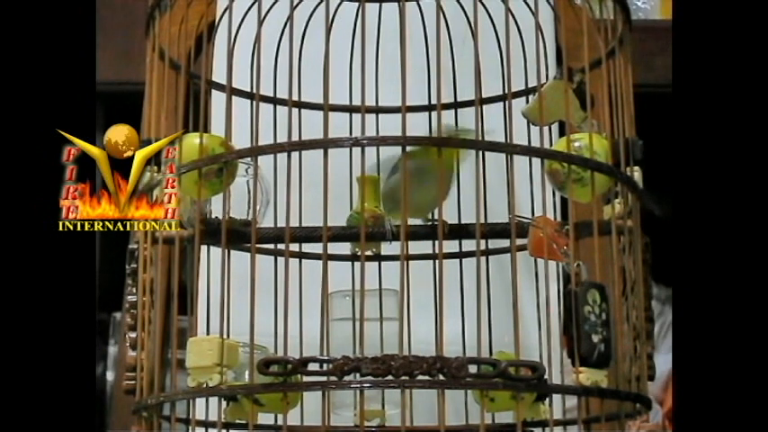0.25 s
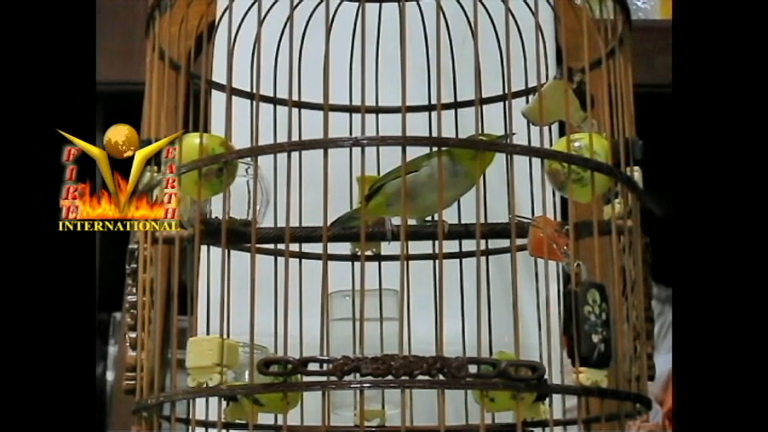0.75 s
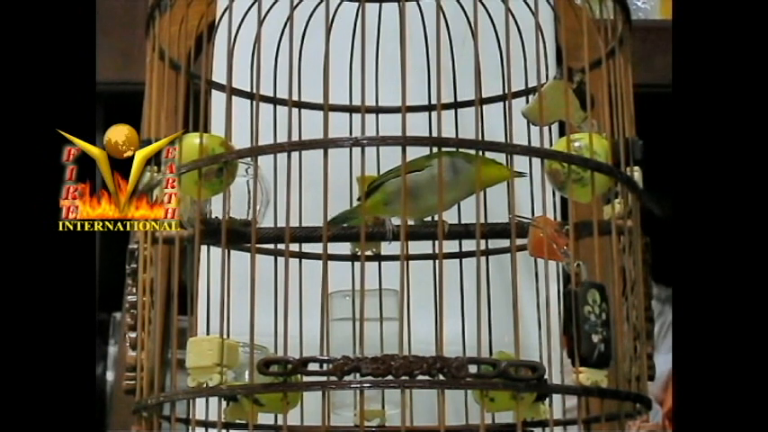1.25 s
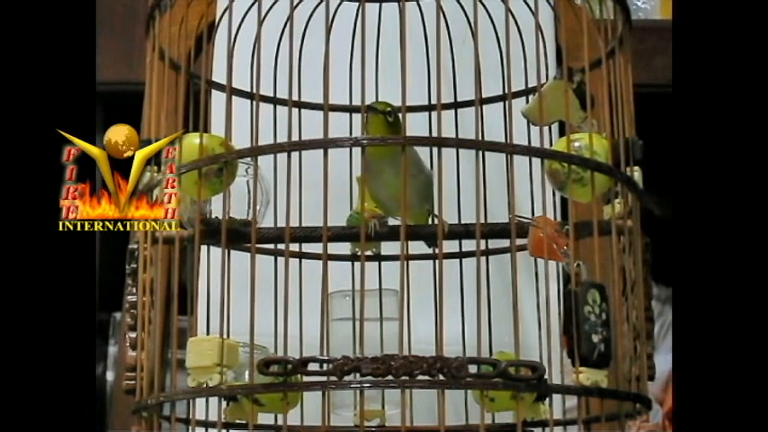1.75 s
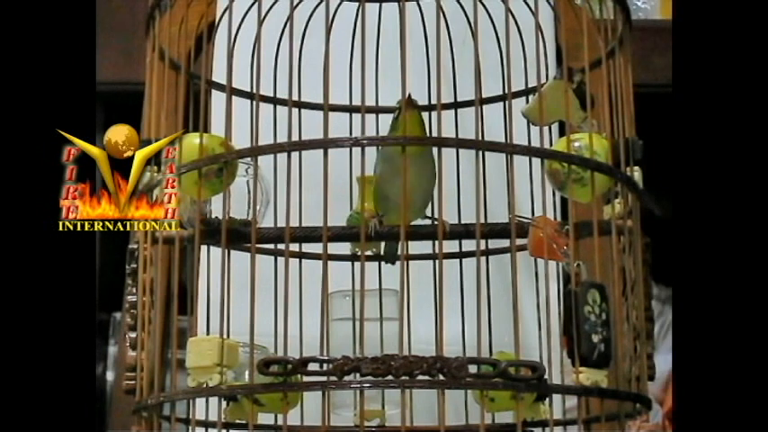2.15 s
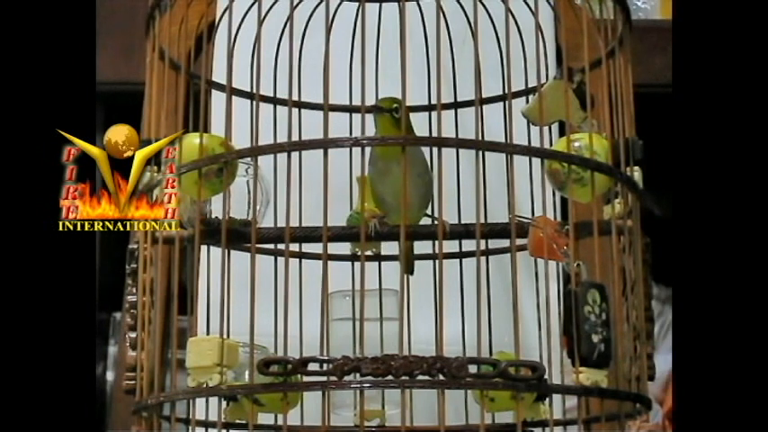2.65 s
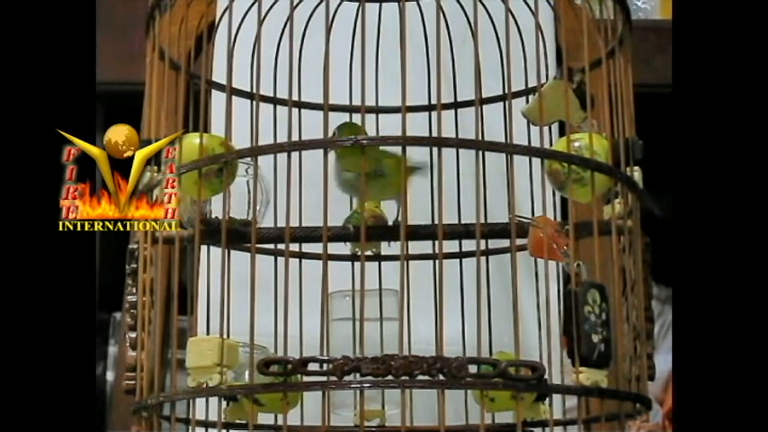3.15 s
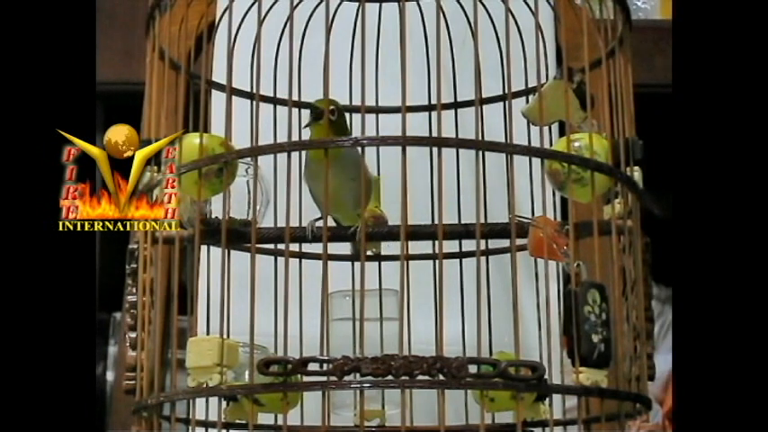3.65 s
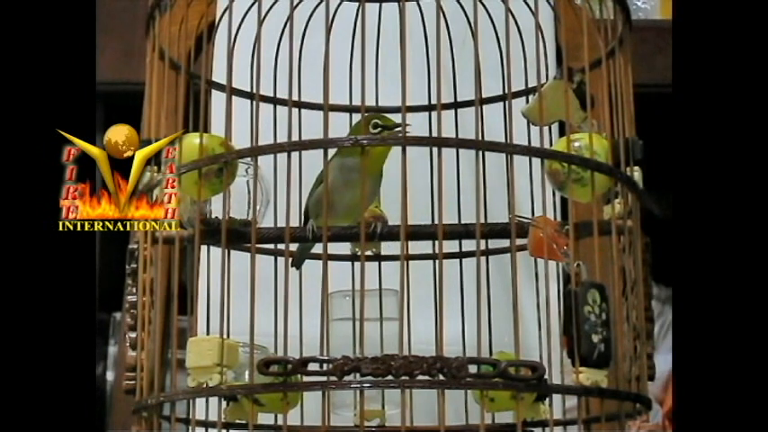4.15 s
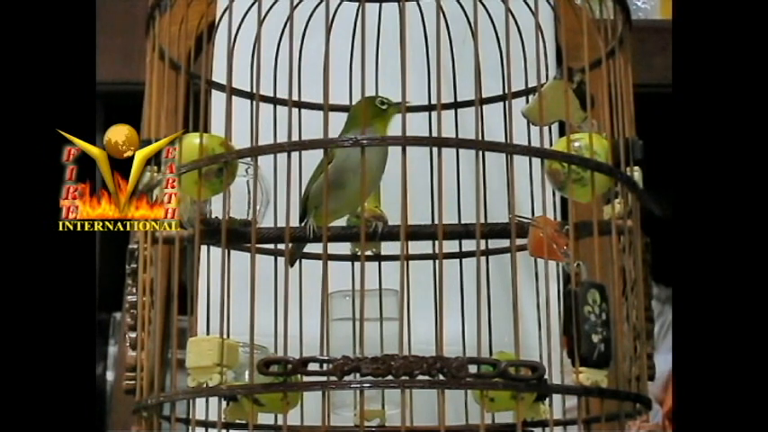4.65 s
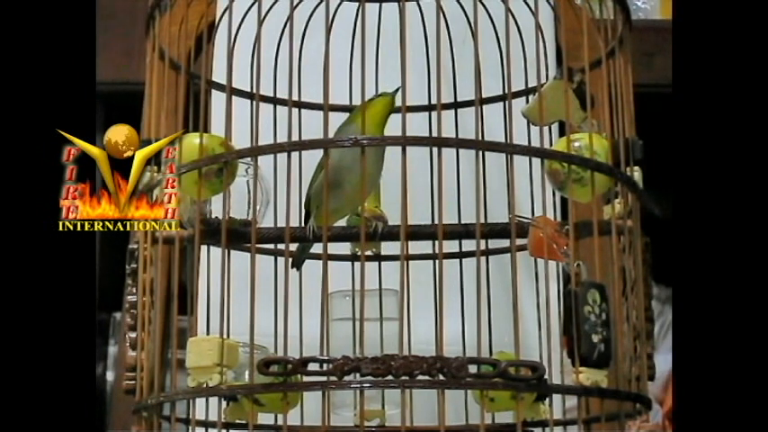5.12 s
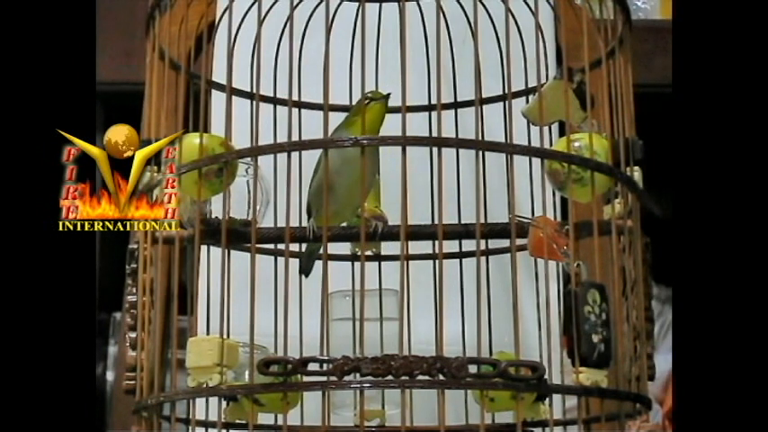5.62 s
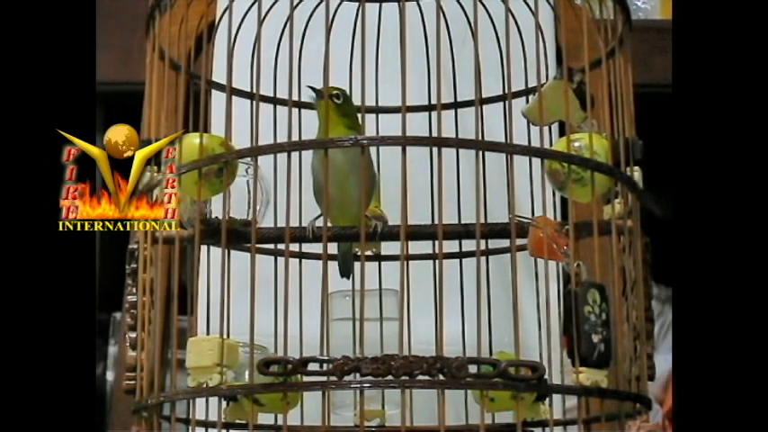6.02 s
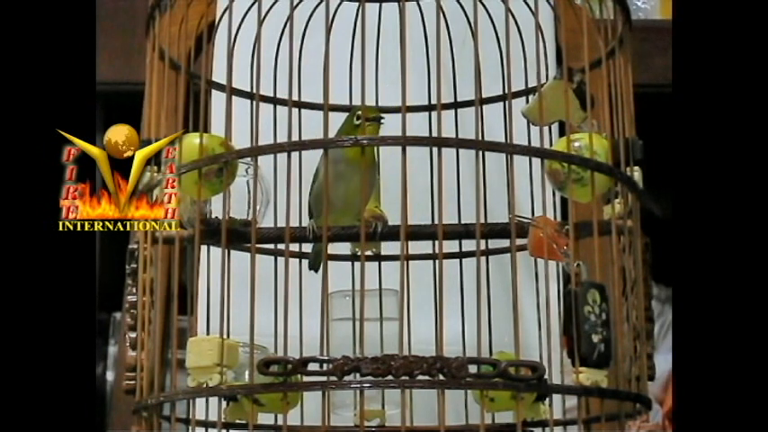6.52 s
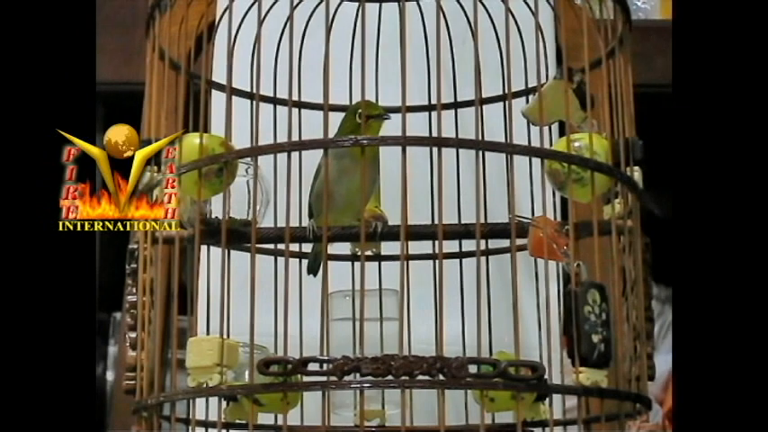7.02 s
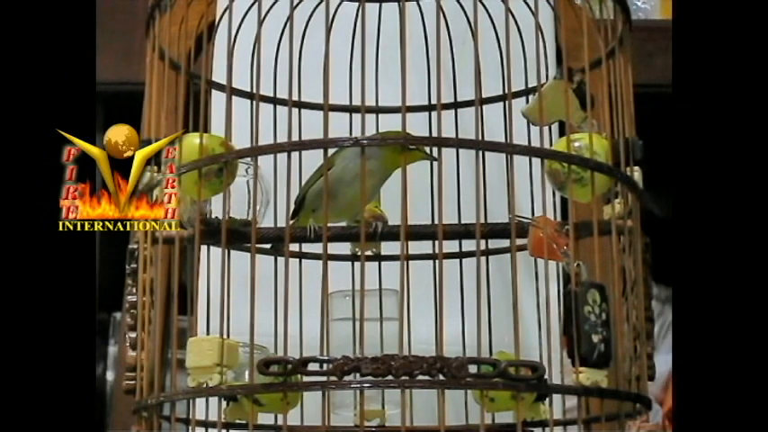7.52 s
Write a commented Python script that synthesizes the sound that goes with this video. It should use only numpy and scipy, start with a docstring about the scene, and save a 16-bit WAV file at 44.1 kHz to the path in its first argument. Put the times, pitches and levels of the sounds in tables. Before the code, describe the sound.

A close caged songbird sings short, falling, piercing whistles in quick succession while other birds answer from across a hard, echoing room.

```python
"""A hard, echoing room: a caged songbird close to the microphone sings short falling whistles.
Other birds answer from further off, one in a neighbouring cage and one lower-voiced; each is a gliding
tone with faint harmonics, followed by sparse random echoes. Filtered noise makes the hiss of the room.
Faint sound drops out shortly after most near notes start and comes back as they die.
The microphone favours about 200 Hz to 6 kHz, and a gain control holds up the echo tails."""
import sys
import numpy as np
from scipy import signal
from scipy.fft import rfft, irfft, next_fast_len
from scipy.io import wavfile
from scipy.ndimage import uniform_filter1d

SR = 44100
rng = np.random.default_rng(int(sys.argv[2]) if len(sys.argv) > 2 else 0)


def nominal_scale(level):
    """Amplitude ratio for a level in decibels (scalar or array-like)."""
    x = np.asarray(level, float) / 20
    return 10 ** x


def to_wav(s):
    """Save 16-bit WAV."""
    ch = np.atleast_2d(s).T  # columns
    pcm = np.round(np.clip(ch, -1, 1) * 32767)  # PCM
    wavfile.write(sys.argv[1], SR, pcm.astype(np.int16))


N = 343090

# Source levels are relative, ahead of the mix and the gain control.
# Near bird, one row a note: level_db, swell_db (over the note), dropout_db (drop of faint sound aimed at),
# pitch [(time_s, pitch_hz)]
NEAR_SONG = [ (-13, 4, 2.9, [(.044, 4310), (.082, 4100), (.098, 3616), (.108, 3585)]),
             (-15.5, 3, 6.3, [(1.287, 4790), (1.309, 5100), (1.32, 4395), (1.33, 4200), (1.351, 4100),
             (1.361, 3600), (1.39, 3520), (1.4, 3330), (1.408, 3520)]), (-16, -3, 22.3, [(1.523, 4992),
             (1.544, 5090)]), (-16, 7, 21, [(1.558, 4267), (1.592, 3906), (1.62, 3647), (1.636, 3500)]),
             (-15.5, 0.5, 22, [(1.906, 5175), (1.914, 5276), (1.944, 4507), (1.978, 3630), (2.009, 3180)]),
             (-19.5, -7, 0.67, [(2.101, 4453), (2.113, 3847), (2.125, 3626), (2.168, 3454), (2.181, 3180)]),
             (-12, 9.5, 50, [(2.239, 4454), (2.247, 4636), (2.289, 4240), (2.299, 3810), (2.321, 3485)]),
             (-18, -8.5, 200, [(2.444, 5880), (2.462, 5870), (2.506, 5310), (2.554, 5095)]),
             (-15.5, 2, 56, [(2.628, 4970), (2.646, 5110), (2.662, 4282), (2.686, 4184), (2.71, 3640),
             (2.75, 3474)]), (-19.5, -5.5, 30, [(3.145, 5400), (3.171, 5320)]),
             (-15.5, 1.5, 28, [(3.187, 4585), (3.219, 4386), (3.247, 3912), (3.291, 3512)]),
             (-13, 6.5, 58, [(3.47, 4844), (3.49, 4690), (3.514, 4237), (3.53, 4115), (3.562, 4574),
             (3.582, 3800), (3.632, 3620)]), (-15.5, 7, 53, [(3.672, 4750), (3.685, 4980), (3.706, 5120),
             (3.724, 5050), (3.731, 4400), (3.757, 4360), (3.77, 4120), (3.785, 4080), (3.801, 4450)]),
             (-13.5, 7, 35.5, [(4.115, 4515), (4.13, 4500), (4.137, 4950), (4.144, 4520), (4.156, 4117),
             (4.188, 3887), (4.204, 3670), (4.24, 3645), (4.266, 3973)]), (-16, 8, 39, [(4.282, 5210),
             (4.308, 5154), (4.322, 4150), (4.34, 3880), (4.388, 3662)]), (-17, 4, 47, [(4.727, 5374),
             (4.737, 4930), (4.753, 4176), (4.775, 4840), (4.803, 4940), (4.857, 4006)]),
             (-15.5, 1.5, 32.6, [(4.915, 4980), (4.937, 5233), (4.959, 4027), (4.991, 4060),
             (5.033, 3458)]), (-14.5, 4, 68, [(5.234, 4090), (5.24, 3810), (5.25, 4826), (5.294, 4548),
             (5.3, 4410), (5.36, 3546)]), (-17, -6.5, 40, [(5.523, 5040), (5.537, 5870), (5.548, 5634),
             (5.558, 4970)]), (-13.5, 6, 38, [(5.572, 4160), (5.585, 3954), (5.605, 4090), (5.62, 3764),
             (5.639, 3826), (5.653, 3736)]), (-14.5, -2, 46.4, [(5.777, 4897), (5.787, 5234), (5.799, 4556),
             (5.823, 4920), (5.849, 4294), (5.905, 4220)]), (-15.5, -3, 87, [(5.954, 6070), (5.968, 6170),
             (6.018, 5010), (6.032, 5090), (6.044, 4770)]), (-16, 1, 44, [(6.176, 5030), (6.19, 5420),
             (6.216, 4496), (6.234, 4280), (6.26, 3455), (6.274, 3570)]), (-16, 10.5, 130, [(6.401, 4600),
             (6.419, 4516), (6.433, 4846), (6.461, 5050), (6.481, 4300), (6.499, 3790), (6.529, 3605)]),
             (-16, 0, 60, [(6.669, 5280), (6.683, 5670), (6.711, 5300), (6.722, 4420), (6.735, 4340),
             (6.769, 4360)]), (-16, -3.5, 8.6, [(6.93, 4426), (6.946, 4104), (6.972, 3478), (6.998, 3120)]),
             ]
# Near notes eased into with a weaker scoop and snap: start_s
SOFT_STARTS_S = [.044, 1.287, 4.727, 6.401]
# Bird in a neighbouring cage, one list of points a note: time_s, pitch_hz, level_db
NEIGHBOUR_NOTES = [
    [(.275, 4300, -29.5), (.295, 4710, -23), (.345, 3730, -17), (.36, 3567, -16), (.415, 3600, -24.5),
     (.435, 3294, -33.5), (.46, 3126, -16)],
]
# Birds across the room, one whistle a row:
# start_s, length_s, first_hz, last_hz, top_level_db, top_place (fraction of the length, 0-1)
FAR_WHISTLES = [ (0.0, .02, 4500, 2910, -28.5, 0.06), (0.117, 0.076, 3734, 2740, -26.5, 0.18),
                (0.592, 0.11, 4744, 2594, -27.5, 0.2), (0.728, 0.093, 5320, 3510, -35, 0.46),
                (0.876, 0.2, 4600, 2934, -31.5, 0.28), (1.115, 0.043, 4200, 3460, -35, 1),
                (1.175, .12, 5077, 3200, -18.5, 0.37), (1.425, .06, 4450, 4080, -23.5, 0.92),
                (1.798, .11, 5293, 3350, -17, 0.73), (2.274, 0.091, 5230, 3157, -19, 0.4),
                (2.54, 0.094, 4290, 3338, -25, 0.5), (2.759, 0.055, 4205, 3287, -18.5, 0),
                (2.907, 0.14, 5090, 3080, -16, 0.4), (3.31, 0.077, 4016, 3133, -22.5, 0),
                (3.812, 0.11, 5400, 3234, -17.5, 0.55), (4.396, .11, 4927, 3277, -18, 0.51),
                (5.067, 0.039, 4213, 3670, -22, 0), (5.392, .09, 4780, 2965, -23.5, 0.54),
                (6.3, 0.054, 4517, 3466, -20.5, 0.16), (7.015, 0.052, 4346, 3200, -23, 0),
                (7.096, 0.08, 3436, 2750, -30.5, 0.2), (7.161, 0.071, 5450, 4320, -35, 0.37),
                (7.184, 0.053, 3790, 3630, -20.5, 0.3), (7.411, 0.092, 4260, 3020, -29.5, 0.54),
                (7.474, 0.067, 4617, 4056, -28, 0.08), (7.623, 0.058, 3980, 3500, -21, 0.4),
                (7.687, .09, 4450, 3535, -27.5, 0.48), ]
# Lower-voiced distant bird, one whistle a row:
# start_s, length_s, first_hz, last_hz, top_level_db, top_place (fraction of the length, 0-1)
LOW_WHISTLES = [ (1.32, 0.12, 1932, 2127, -49, 0.5), (1.606, 0.47, 2198, 2300, -43.5, 0.42),
                (2.108, 0.072, 2517, 2640, -41.5, 0.1), (5.726, 0.054, 2334, 2440, -39.5, 0),
                (6.292, 0.059, 2655, 2715, -40, 0.57), (6.378, 0.035, 3073, 2920, -35, 0.4),
                (6.819, .06, 2275, 2220, -44.5, 0), (7.245, 0.17, 1940, 1977, -48.5, 0),
                (7.724, 0.028, 2754, 2890, -41.5, 0), ]
# Decay time of the echoes: frequency_hz, t60_s
ECHO_DECAY = [(2000, 0.56), (4000, 0.52), (7000, 0.68)]
# Spectral shape of the room hiss: frequency_hz, relative_level_db (per Hz)
HISS_SPECTRUM = [(60, -68.5), (140, -56.5), (226, -42), (400, -17.5), (740, -8.5), (1080, -7.5),
                 (1600, -13.5), (2400, -11.5), (4000, -7.5), (5500, -34.5), (7300, -69.5)]
# Level faint sound is brought to between near notes, on the same scale as HISS_DB: time_s, level_db
FAINT_LEVEL = [(0.0, -45.5), (1.25, -45.5), (1.8, -40.5), (2.2, -53), (3.1, -51.5), (4.6, -53), (5.7, -59),
               (6.9, -65.5), (7.3, -57), (7.78, -53)]
# Response of the microphone: frequency_hz, gain_db
MICROPHONE_RESPONSE = [(60, -10), (130, -4.5), (220, 0.5), (2000, 1), (5500, 0.5), (6500, -15.5),
                       (7250, -25.5), (7600, -63), (9000, -70), (12000, -60), (16000, -70)]

BEAK_HZ, BEAK_WIDTH_HZ = 6500, 500  # the open beak favours upper harmonics here
# random beating in the level of near notes, standing in for close reflections: depth and spacing
BEATING_DB, BEATING_S = 4, 0.005
ACCENT_DB, ACCENT_S = 1.5, 0.036  # push at the start of a near note, and its decay
HISS_DB = -43.5  # level of the steady hiss at 600-1400 Hz, ahead of gain control and drop-outs
DROP_DELAY_S, DROP_HOLD_S = 0.0083, 0.018  # after the start and the end of a near note
DROP_DB_PER_S, RETURN_DB_PER_S = 586, 698.5  # how fast faint sound leaves and returns


def whistle(rows, scoop, lower_db, upper_db, snap_db, rough):
    """The whistle is the second harmonic of the voice box; the others are faint except at the start."""
    s, *columns = np.transpose(rows)
    t = np.arange(max(s[0] - 0.007, 0), min(s[-1] + 0.0047, N / SR), 1 / SR)
    hz, level_db = (np.interp(t, s, c) for c in columns)
    age = t - t[0]
    # the pitch shoots up into the note, then quivers at 120 Hz as it settles
    hz = hz * (1 - scoop * np.exp(-(age / 0.0042) ** 2))
    hz = hz * (1 + scoop * 0.074 * np.exp(-age / 0.035) * np.sin(2 * np.pi * 120 * age))
    jitter, rasp = rng.standard_normal((2, len(t)))
    hz = hz * (1 + rough * evened(uniform_filter1d(jitter, 90)))
    turns = np.pi * np.cumsum(hz) / SR  # phase of the first harmonic, at half the whistle's pitch

    snap = nominal_scale(snap_db * np.exp(-(age / 0.009) ** 2))
    third = nominal_scale(upper_db) / np.hypot(1, (3 * hz / 2 - BEAK_HZ) / BEAK_WIDTH_HZ) ** 2
    third = third + nominal_scale(-17.0) * (snap - 1)
    fourth = nominal_scale(upper_db - 4) / np.hypot(1, (2 * hz - BEAK_HZ) / BEAK_WIDTH_HZ)
    tone = np.sin(2 * turns)
    tone += nominal_scale(lower_db) * snap * np.sin(turns)
    tone += third * np.sin(3 * turns)
    tone += fourth * np.sin(4 * turns)
    # a rasp of air before the voice locks in
    tone += nominal_scale(-27.5) * (snap - 1) * (rasp - uniform_filter1d(rasp, size=20))
    edges = np.clip(np.minimum(age / 0.008, (t[-1] - t) / 0.013), 0, 1) ** 1.1
    return round(t[0] * SR), np.sqrt(2) * nominal_scale(level_db) * edges * tone


def bird(notes, scoop, snap_db, **voice):
    """Lays notes out in time; only a note after a pause has the scooped, snapping start."""
    out, end = np.zeros(N), -1
    for rows in notes:
        start = rows[0][0]
        eased = np.min(abs(start - np.array(SOFT_STARTS_S))) < 0.012
        fresh = (start - end > 0.019) * (0.4 if eased else 1)
        at, note = whistle(rows, scoop * fresh, snap_db=snap_db * fresh, **voice)
        out[at:at + len(note)] += note[:N - at]
        end = rows[-1][0]
    return out


def sung(level_db, swell_db, dropout_db, pitch):
    """A near note as rows (s, Hz, dB): a push, an even swell, and beating as from close reflections."""
    s, hz = np.transpose(pitch)
    t = np.linspace(s[0], s[-1], num=80)
    hz = np.interp(t, s, hz)
    age = t - s[0]
    knots = np.arange(60) * BEATING_S
    beating = np.interp(age, knots, rng.standard_normal(len(knots)))
    db = level_db + swell_db * (age / (s[-1] - s[0]) - 0.5)
    db = db + BEATING_DB * beating + ACCENT_DB * np.exp(-age / ACCENT_S)
    return np.transpose([t, hz, db])


def near_bird():
    """The close voice: strongly scooped starts, gliding pitch with little random jitter."""
    notes = [sung(*row) for row in NEAR_SONG]
    return bird(notes, scoop=0.3223, lower_db=-34, upper_db=-22.5, snap_db=21, rough=0.012)


def neighbour_bird():
    """The voice from the next cage: plain starts, without scoop or snap."""
    return bird(NEIGHBOUR_NOTES, scoop=0, lower_db=-46, upper_db=-30, snap_db=0, rough=0.016)


def glide(row, bend, rise_db_per_s, fade_db_per_s):
    """A whistle as rows (s, Hz, dB): the pitch moves fast at first, the level climbs and fades."""
    start, length, first_hz, last_hz, top_db, top = row
    u = np.linspace(0, 1, num=12)
    late = (u - np.clip(top, 0, 1)) * length  # seconds past the loudest point
    hz = last_hz + (first_hz - last_hz) * (1 - u) ** bend
    db = top_db + np.minimum(rise_db_per_s * late, -fade_db_per_s * late)
    return np.transpose([start + u * length, hz, db])


def far_birds():
    """Whistles across the room, with rougher pitch and weak harmonics."""
    notes = [glide(row, bend=1.2, rise_db_per_s=148, fade_db_per_s=161) for row in FAR_WHISTLES]
    return bird(notes, scoop=0.03, lower_db=-46, upper_db=-27, snap_db=6, rough=0.025)


def low_bird():
    """The lower distant voice, nearly a pure tone, rising and fading slowly."""
    notes = [glide(row, bend=1.9, rise_db_per_s=57.5, fade_db_per_s=92) for row in LOW_WHISTLES]
    return bird(notes, scoop=0.012, lower_db=-54, upper_db=-44.5, snap_db=11, rough=0.018)


def room(x, gap):
    """Sparse echoes of random sign build up over gap seconds, then decay, the time set by frequency."""
    taps = np.zeros(SR)
    at = np.arange(0, SR - 20, 20) + rng.integers(0, 20, (SR - 1) // 20)
    taps[at] = rng.choice([-1., 1.], len(at))
    hz, t, z = signal.stft(taps, SR, nperseg=256)
    t60 = np.maximum(read(ECHO_DECAY, hz), 0.05)[:, None]
    tail = signal.istft(z * nominal_scale(-60 * t / t60), SR, nperseg=256)[1][:SR]
    tail *= 1 - np.exp(-np.arange(SR) / SR / gap)
    return signal.fftconvolve(x, tail / np.linalg.norm(tail))[:N]


def roughened(x, share, width):
    """Fast random level modulation by twice-smoothed noise roughens the echo tails."""
    noise = uniform_filter1d(rng.standard_normal(N), size=width)
    modulation = evened(uniform_filter1d(noise, size=width))
    return x * (1 + share * modulation) / np.hypot(1, share)


def hiss():
    """Steady coloured noise of the room."""
    noise = colour(rng.standard_normal(N), lambda hz: read(HISS_SPECTRUM, hz))
    middle = colour(noise, lambda hz: np.where(abs(hz - 1000) < 400, 0, -200))
    return nominal_scale(HISS_DB) * noise / middle.std()


def evened(x):
    """Scales to rms 1."""
    return x / np.sqrt(np.mean(x ** 2) + 1e-20)


def read(points, hz):
    """Reads a (Hz, value) table on a log-frequency axis."""
    f, value = np.transpose(points)
    return np.interp(np.log(hz + 1), np.log(f + 1), value)


def colour(x, gain_db):
    """Filters x by a dB gain given as a function of frequency."""
    size = next_fast_len(len(x))
    gain = nominal_scale(gain_db(np.fft.rfftfreq(size, 1 / SR)))
    return irfft(rfft(x, size) * gain, size)[:len(x)]


def scene():
    """Near bird half direct, far birds mostly echo, over the hiss of the room."""
    near, low, beside = near_bird(), low_bird(), neighbour_bird()
    far = far_birds() + beside  # the neighbour also shares the far birds' path
    near_echo = roughened(room(near, gap=0.0023), share=0.2, width=24)
    far_echo = roughened(room(far, gap=0.00067), share=0.2, width=24)
    low_echo = room(low, gap=0.0013)
    direct = nominal_scale(2.5) * near + nominal_scale(-5.0) * beside + nominal_scale(-7.5) * far + nominal_scale(-12) * low
    echoes = nominal_scale(-0.5) * near_echo + nominal_scale(5.5) * far_echo + nominal_scale(14.0) * low_echo
    return (direct + echoes + hiss())[None]


def levelled(x, knee_db, share, recovery_db_per_s):
    """Gain control: falls at once on loud notes and recovers steadily, which holds up the echo tails."""
    power_db = 10 * np.log10(abs(uniform_filter1d(x ** 2, 300)) + 1e-12)
    fall = np.arange(N) * recovery_db_per_s / SR
    held_db = np.maximum.accumulate(power_db + fall) - fall
    over_db = np.maximum(held_db - knee_db, 0)
    return x / nominal_scale(share * uniform_filter1d(over_db, 200))


def faint_db(t):
    """Faint sound sinks shortly after a near note starts, as far as rate and length let it, then returns."""
    goal, now, out = np.zeros(len(t)), 0, np.zeros(len(t))
    for *_, dropout_db, pitch in NEAR_SONG:
        under = (t > pitch[0][0] + DROP_DELAY_S) & (t < pitch[-1][0] + DROP_HOLD_S)
        goal[under] = dropout_db
    step = t[1] - t[0]
    for k, db in enumerate(goal):
        now = out[k] = min(max(db, now - RETURN_DB_PER_S * step), now + DROP_DB_PER_S * step)
    return np.interp(t, *np.transpose(FAINT_LEVEL)) - out


def dropouts(x, knee_db, soft_db, spared_db):
    """Frequencies that are faint at the moment follow the faint level; strong ones pass."""
    hz, t, z = signal.stft(x, SR, nperseg=512, noverlap=384)
    power = uniform_filter1d(uniform_filter1d(abs(z) ** 2, size=5, axis=0), size=5, axis=1)
    # from about 2900 Hz up, the band of the song is touched less
    spared = spared_db / (1 + np.exp((2900 - hz[:, None]) / 250))
    over_db = 10 * np.log10(power + 1e-20) - knee_db + spared
    faint = 1 / (1 + np.exp(np.clip(over_db / soft_db, -30, 30)))
    # the lowest rumble stays
    faint = faint / (1 + np.exp(np.minimum((260 - hz[:, None]) / 60, 30)))
    left_db = faint_db(t) - HISS_DB
    return signal.istft(z * nominal_scale(faint * left_db), SR, nperseg=512, noverlap=384)[1][:N]


def band_limit(x):
    """A steep low-pass at the top of the band."""
    return signal.sosfilt(signal.butter(12, 7460, fs=SR, output="sos"), x)


def record(dry):
    """Gain control, drop-outs of faint sound, the narrow microphone band and a trace of white noise."""
    even = levelled(dry[0], knee_db=-17.5, share=0.46, recovery_db_per_s=120.0)
    thinned = dropouts(even, knee_db=-51.0, soft_db=11, spared_db=18.5)
    narrow = colour(thinned, lambda hz: read(MICROPHONE_RESPONSE, hz))
    mix = narrow + nominal_scale(-84.5) * rng.standard_normal(N)
    return band_limit(mix[None])


dry = scene()
out = record(dry)
to_wav(out)
```